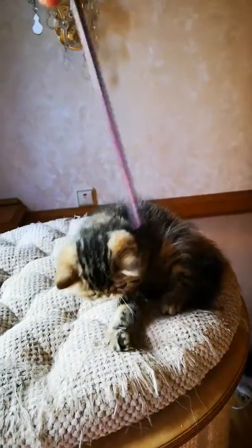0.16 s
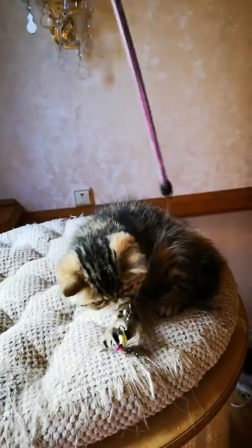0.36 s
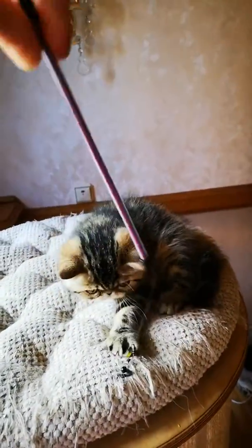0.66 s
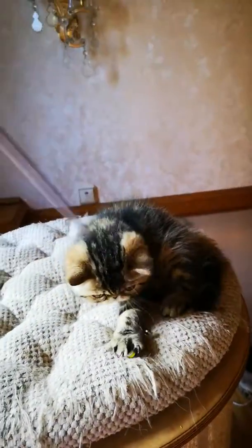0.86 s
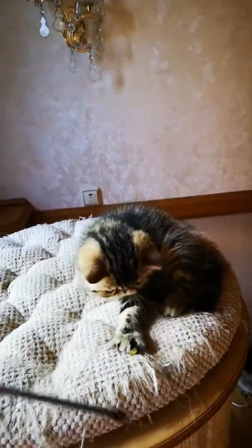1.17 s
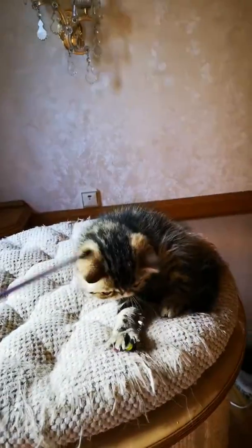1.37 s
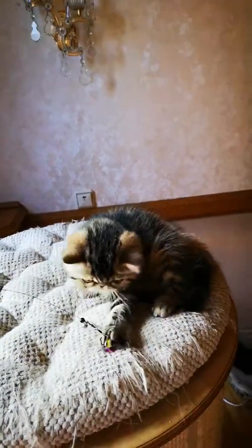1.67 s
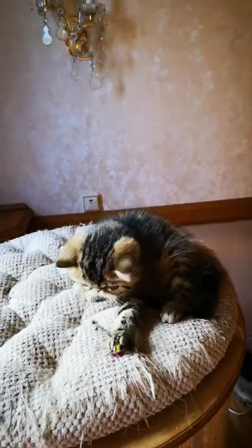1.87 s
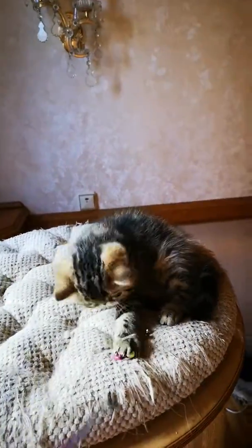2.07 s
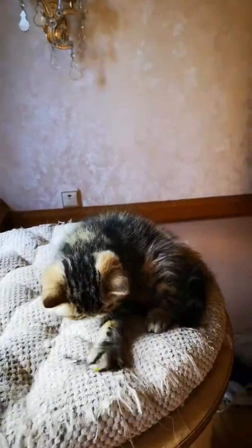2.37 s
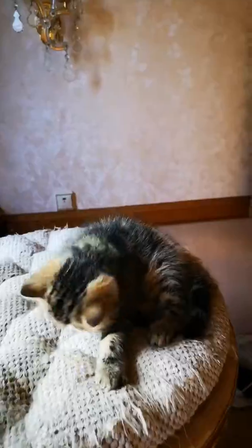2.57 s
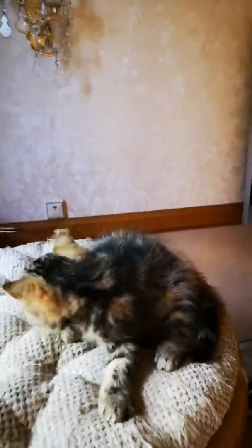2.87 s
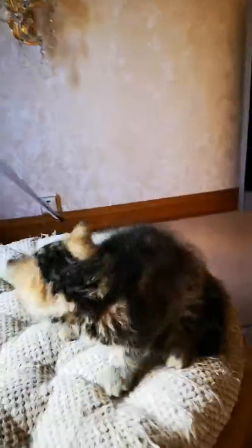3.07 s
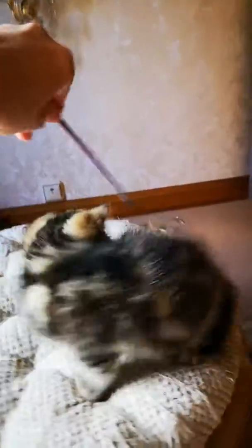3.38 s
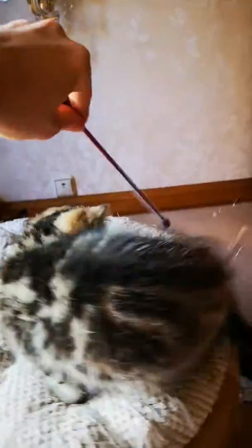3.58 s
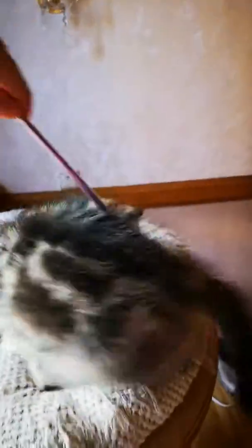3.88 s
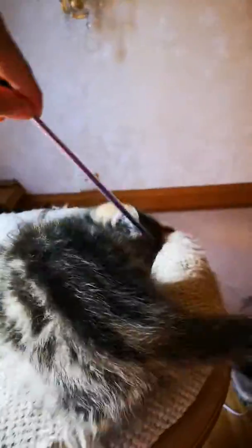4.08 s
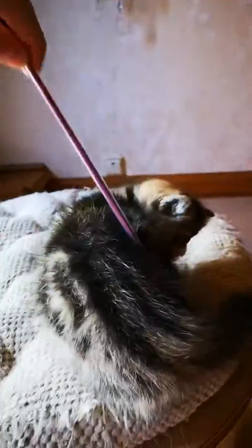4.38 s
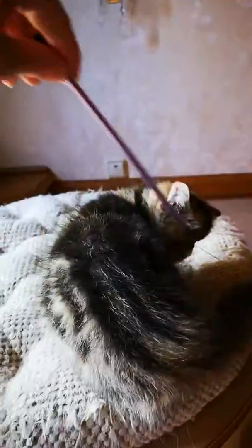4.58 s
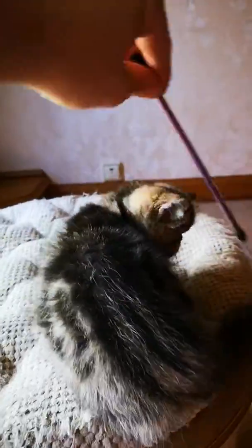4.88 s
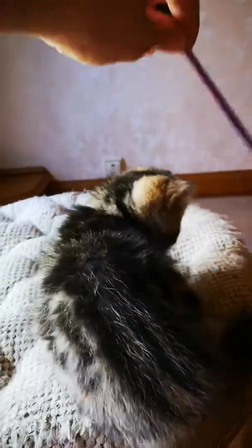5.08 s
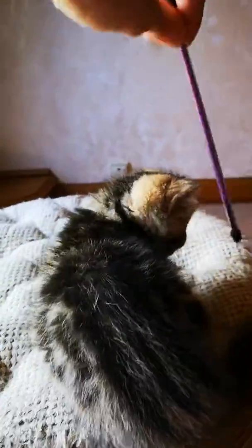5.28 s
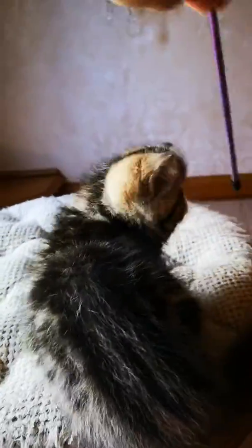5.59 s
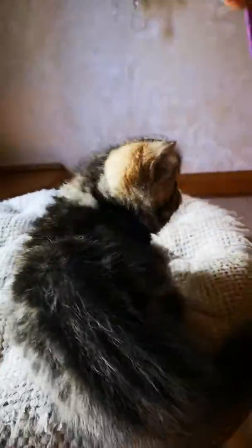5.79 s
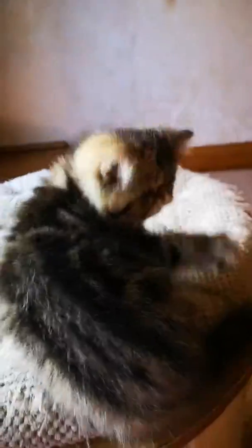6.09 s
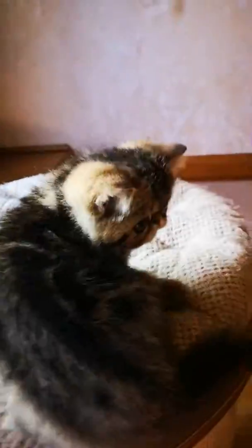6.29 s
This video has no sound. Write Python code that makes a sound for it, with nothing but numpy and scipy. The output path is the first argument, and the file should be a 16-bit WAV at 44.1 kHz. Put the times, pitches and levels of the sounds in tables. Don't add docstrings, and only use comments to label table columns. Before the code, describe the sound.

A tiny toy bell jingles and ticks as a kitten's paws brush knitted wool, then the toy raps sharply on wood in a quiet room.

```python
import sys
import numpy as np
from scipy import signal
from scipy.io import wavfile

SR = 44100
rng = np.random.default_rng(int(sys.argv[2]) if len(sys.argv) > 2 else 0)


def field_ratio(decibels):
    return 10 ** (np.asarray(decibels, dtype=float) / 20)


def transcribe(u):
    v = np.clip(np.atleast_2d(u).T, -1, 1)
    q = np.round(v * 32767).astype(np.int16)
    wavfile.write(sys.argv[1], SR, q)


N = 284004


def rms_one(x):
    return x / np.sqrt(np.mean(x ** 2) + 1e-20)


def in_time(rows):
    start_s, *columns = np.transpose(rows)
    return [np.interp(np.arange(N) / SR, start_s, column) for column in columns]


def at_hz(points, hz):
    points_hz, values = np.transpose(points)
    return np.interp(np.log(hz), np.log(points_hz), values)


def drift(rate_hz):
    r = np.exp(-80 * np.pi * rate_hz / SR)
    slow = signal.lfilter([1], [1, -2 * r, r * r], rng.standard_normal(N // 40 + 2002))[2000:]
    return np.interp(np.arange(N) / 40, np.arange(len(slow)), rms_one(slow))


def swells(rows, floor_db, rise_s, fall_s):
    t = np.arange(N) / SR
    power = field_ratio(2 * floor_db)
    for peak_s, level_db in rows:
        width_s = np.where(t < peak_s, rise_s, fall_s)
        power = power + field_ratio(2 * level_db) * np.exp(-((t - peak_s) / width_s) ** 2)
    return 10 * np.log10(power)


def passband(x, low_hz, high_hz, order=2):
    edges_hz = [low_hz, min(high_hz, .45 * SR)]
    return signal.sosfilt(signal.butter(order, edges_hz, "band", fs=SR, output="sos"), x)


def ring(clicks, hz, t60_s):
    r, w = field_ratio(-60 / (t60_s * SR)), 2 * np.pi * hz / SR
    return signal.lfilter([0, np.sin(w)], [1, -2 * r * np.cos(w), r * r], clicks + 1e-18)


def clicks_at(times_s, levels_db, pans_db):
    out = np.zeros((2, N))
    out[:, np.round(times_s * SR).astype(int)] = field_ratio(levels_db + pans_db * np.array([[.5], [-.5]]))
    return out


def grains(per_s, spread_db):
    sizes = field_ratio(spread_db * np.minimum(rng.exponential(1, N), 4)) * rng.choice([-1, 1], N)
    return sizes * (rng.random(N) < per_s / SR)


# freq_hz, correlation
LIKENESS = [(60, 1.0), (130, 1), (290, 0.78), (640, -0.29), (1410, 0.57), (3100, 0.098), (6820, 0.036),
            (15000, -0.79)]


def banded(spectrum, white, patchy_db):
    out = 0
    low_hz, high_hz = spectrum[0][0], spectrum[-1][0]
    edges = low_hz * 2 ** np.arange(0, np.log2(high_hz / low_hz) + .3, 1 / 3)
    for k, (low, high) in enumerate(zip(edges, edges[1:])):
        mid, side = passband(white[k % 2], low, high)
        hz = np.sqrt(low * high)
        alike = np.clip(at_hz(LIKENESS, hz), -1, 1)
        gain = field_ratio(at_hz(spectrum, hz) + patchy_db * drift(10.8))
        out = out + gain * (np.sqrt(1 + alike) * mid + np.sqrt(1 - alike) * side * [[1], [-1]])
    return rms_one(out)


# freq_hz, density_db_per_hz
HUSH = [(180, -13), (300, -6), (385, -14), (528, -4), (565, -18), (749, -3), (961, -5), (2170, -7),
        (2930, -10.5), (8220, -11), (11500, -22), (14700, -31), (16000, -33)]


def hush():
    return field_ratio(-62) * banded(HUSH, rng.standard_normal((2, 2, N)), patchy_db=2.5)


# freq_hz, density_db_per_hz
TRAFFIC = [(65, -44), (110, -2.5), (172, 6), (231, -2), (353, -9.5), (450, -26.5), (580, -25), (990, -120)]
# peak_s, level_db
WAVES = [(.45, -63.5), (1.05, -61), (2.45, -57), (3.8, -60), (5.2, -57.5), (6.3, -60.5)]


def traffic():
    level_db = swells(WAVES, floor_db=-61.5, rise_s=0.27, fall_s=0.27)
    return field_ratio(level_db) * banded(TRAFFIC, rng.standard_normal((2, 2, N)), patchy_db=2.5)


# peak_s, level_db
PASSES = [
    (.45, -56.5),
    (2.65, -57.5),
]


def engine_note():
    level_db = swells(PASSES, floor_db=-76, rise_s=0.096, fall_s=0.095)
    hz = 239.6 + 3.8 * drift(10.3)
    return field_ratio(level_db + 1.0 * drift(2.2)) * np.sin(2 * np.pi * np.cumsum(hz) / SR)


# peak_s, level_db
GUSTS = [(.55, -51), (.95, -51), (1.3, -48.5), (2.35, -47), (2.9, -66), (4.8, -59.5), (5.4, -52.5),
         (5.97, -37.5), (6.3, -37)]


def air_and_drone():
    gust_db = swells(GUSTS, floor_db=-58.5, rise_s=0.082, fall_s=0.069)
    mid, side = passband(rng.standard_normal((2, N)), 23, 40)
    air = field_ratio(gust_db) * rms_one(mid + field_ratio(-27) * side * [[1], [-1]])
    leaves_s, fade_db_per_s, buffet_db = 3.17, 4.5, -10.5
    drone_db = -58.5 - fade_db_per_s * np.maximum(np.arange(N) / SR - leaves_s, 0)
    mid, side = passband(rng.standard_normal((2, N)), 52, 105)
    drone = rms_one(mid + field_ratio(-19.5) * side * [[1], [-1]])
    return air + np.hypot(field_ratio(drone_db), field_ratio(gust_db + buffet_db)) * drone


# peak_s, level_db
LOADS = [(2.65, -66.5), (2.85, -66), (4.3, -69), (4.5, -61.5), (4.72, -63), (5.52, -63.5), (5.66, -65.5)]
# freq_ratio, level_db
WHINE_PARTNERS = [(1.152, -8), (2, -6), (1.54, -11), (.972, -11)]


def whine():
    idle_db, motor_hz, load_shift_hz_per_db = -74, 2177, 0.4
    level_db = swells(LOADS, idle_db, rise_s=.07, fall_s=.07)
    hz = motor_hz + load_shift_hz_per_db * (level_db - idle_db)
    turns = 2 * np.pi * np.cumsum(hz + 2.24 * drift(6.0)) / SR
    lines = np.sin(turns)
    for ratio, db in WHINE_PARTNERS:
        lines = lines + field_ratio(db + 2.5 * drift(2)) * np.sin(ratio * turns)
    return np.sqrt(2) * field_ratio(level_db + 1.5 * drift(5)) * lines


# freq_hz, density_db_per_hz
WOOL = [(300, -1), (600, -3.5), (1200, -6), (2200, -1.5), (4000, -8.5), (8000, -7.5)]
# peak_s, level_db
SWEEPS = [(.3, -59), (.95, -63), (1.27, -60.5), (2.3, -57), (2.62, -56.5), (3.8, -59), (4.3, -62.5),
          (4.9, -66)]


def brushing():
    fibres = np.array([rms_one(grains(1500.0, spread_db=4.5)) for port in range(2)])
    level_db = swells(SWEEPS, floor_db=-72, rise_s=0.073, fall_s=0.074)
    return field_ratio(level_db) * banded(WOOL, [fibres, fibres[::-1]], patchy_db=1.0)


# start_s, peak_db
PLUCKS = [(1.4127, -67), (2.6464, -44), (2.6864, -55), (2.7666, -37), (3.3344, -69), (4.2244, -35),
          (4.2438, -42), (4.6179, -52), (5.8676, -33)]


def plucks():
    start_s, peak_db = np.transpose(PLUCKS)
    return passband(clicks_at(start_s, peak_db + 16, 0 * start_s - 3.0), 11500, 16500)


# start_s, peak_db, treble_db, body_db, left_right_db
KNOCKS = [(0.5528, -35.5, 6, -3, -4), (1.335, -51, -20, 1, 5), (2.3059, -45, -2, 11, -2),
          (2.3364, -36.5, -1, 4.5, -2), (2.5954, -52.5, 10, 5, 11), (3.0004, -35.5, -17, -24, -4),
          (3.0507, -31, -10, -3.5, -4), (3.6678, -24.5, -11, -22, -3.5), (4.9546, -10, -13.5, -35, -4),
          (5.3028, -23.5, -61, -20, -9.5), (5.3171, -21, -9.5, -33, -0.5), (5.7008, -22, -37, -28, -3),
          (5.7675, -20, -11, -18, -2.5), (5.8996, -35.5, 4, -44, -7), (5.9143, -15.5, -41, -29, 2),
          (6.0066, -19.5, -12, -28, -2.5), (6.115, -10, -12, -32, -5.5), (6.2544, -16.5, -10, -35, -11.5),
          (6.2787, -18, -10.5, -19.5, 2.5)]
# freq_hz, width_hz, level_db
WOOD = [(1404, 100, -46), (1660, 880, 0), (2910, 800, 5.5), (4800, 3140, -5.5)]
# freq_hz, level_db, t60_s
SEAT = [(1370, 6, 0.0077), (1544, -1.5, 0.18), (1832, 8, 0.065), (2095, 11.5, 0.072), (2331, 2.5, 0.15),
        (2405, -6, 0.069)]


def knocks():
    start_s, peak_db, treble_db, body_db, pan_db = np.transpose(KNOCKS)
    snap_s = start_s + .0006
    blows = clicks_at(snap_s, peak_db + 16.0, pan_db)
    wood = 0
    for k, (hz, width_hz, db) in enumerate(WOOD):
        wood = wood + (-1) ** k * field_ratio(db) * passband(blows, hz - width_hz / 2, hz + width_hz / 2, order=1)
    seat = sum(field_ratio(db - 47.5) * ring(blows, hz, t60_s) for hz, db, t60_s in SEAT)
    crack = passband(clicks_at(snap_s, peak_db + treble_db + 20, pan_db), 3900, 10500)
    body = passband(clicks_at(start_s, peak_db + body_db + 18, pan_db), 173, 1020)
    snap = field_ratio(3) * passband(blows, 1600, 4800, order=4) + crack
    thud = passband(wood + seat, 1170, 10700, order=3) + field_ratio(-11.5) * crack + field_ratio(-5.0) * body
    return snap + body, thud


# freq_hz, level_db, t60_s
BELL = [(9626, -1.5, 0.061), (9230, -18.5, 0.01), (9820, -15.5, 0.024), (11100, -30, 0.14)]
# peak_s, peak_db
TICKS = [(.14, -25.5), (.1498, -22.5), (.1778, -26.5), (.3144, -23.5), (.539, -30.5), (1.2192, -17.5),
         (.857, -33.5), (.903, -23.5), (1.0023, -33.5), (1.2586, -26), (2.3384, -14.5), (2.4025, -30.5),
         (2.7321, -48), (2.3489, -17), (3.6457, -38), (3.6695, -30), (3.771, -19.5), (4.2998, -30),
         (4.4818, -25.5), (4.5221, -25), (4.6194, -26.5), (2.2328, -22.5), (5.116, -24), (5.9219, -52),
         (5.9742, -22.5), (6.0257, -17.5), (6.0623, -26), (6.1153, -24), (6.1745, -26), (6.2953, -27)]
# peak_s, peak_db
TAPS = [(.0194, -28.5), (.268, -24), (.3406, -32.5), (.3606, -31.5), (.8922, -30), (.5677, -40),
        (1.2971, -24.5), (1.3722, -46), (1.426, -43.5), (2.0502, -46), (2.108, -45), (2.2148, -26.5),
        (4.8302, -29.5), (3.084, -42), (2.5192, -22), (2.6442, -36), (3.2484, -42), (3.4728, -41),
        (3.5657, -30), (3.523, -37.5), (4.3282, -23), (4.416, -32), (4.6603, -25.5), (4.7655, -33.5),
        (5.045, -38), (5.315, -23.5), (5.7723, -25), (5.8874, -21.5), (6.009, -11), (6.0797, -26.5)]
# peak_s, peak_db
RINGS = [(.1274, -27), (.2136, -27), (.2534, -19), (.4049, -39), (.942, -33.5), (1.044, -45),
         (1.189, -35.5), (1.205, -26), (1.245, -31.5), (2.606, -33), (3.3538, -39), (3.9308, -39.5),
         (3.787, -26.5), (3.804, -22.5), (4.048, -39.5), (4.224, -30.5), (4.245, -29), (4.2622, -30.5),
         (4.448, -29), (4.6987, -30), (4.8438, -28), (5.2263, -29.5), (5.2935, -25), (5.342, -30.5),
         (5.5312, -32.5), (5.604, -40), (5.734, -31.5), (5.792, -29), (6.2256, -31), (6.4033, -26)]
# peak_s, peak_db
SKIDS = [(.063, -39.5), (.5107, -34.5), (.9751, -31.5), (1.284, -30.5), (2.3127, -31), (2.4439, -31.5),
         (2.5706, -33.5), (2.7058, -42), (2.7525, -36.5), (3.7152, -24.5), (4.199, -48), (4.306, -23.5),
         (4.4635, -29.5), (5.0893, -26), (5.1918, -28.5), (5.4177, -48.5), (5.493, -36), (5.579, -37),
         (5.8118, -30), (.62, -44.5), (2.4784, -48), (2.9, -46), (3.761, -29.5), (5.053, -28),
         (5.879, -27.5), (5.8968, -33), (6.1576, -30.5), (6.2637, -30.5)]


def bell_blows(pan_db):
    out, t = np.zeros((2, N + 4000)), np.arange(-1000, 3000) / SR
    after = np.maximum(t, 0)
    main_t60_s = BELL[0][2]
    choke_ms, choke_early_s = 1.5, .004
    kinds = [(TICKS, 0.7, 2), (TAPS, 1.0, 4.1), (RINGS, 1, 15.6), (SKIDS, 7.9, 2.5)]  # swell_ms, fade_ms
    strikes = sorted((*row, swell_ms, fade_ms) for rows, swell_ms, fade_ms in kinds for row in rows)
    until_next_s = np.diff([row[0] for row in strikes], append=N / SR + 1)
    luck = rng.normal(0, 1, (len(strikes), 2 * len(BELL) + 2))
    for (peak_s, peak_db, swell_ms, fade_ms), gap_s, chance in zip(strikes, until_next_s, luck):
        swell = field_ratio(-6 * (t * 1e3 / max(swell_ms, .3)) ** 2)
        fade = field_ratio(-6 * t * 1e3 / max(fade_ms, .4))
        shape = np.where(t < 0, swell, fade)
        shape = np.maximum(shape, field_ratio(-15.0 - 60 * t / main_t60_s) * (t > 0))
        shape = shape * field_ratio(-6 * np.maximum(t - gap_s + choke_early_s, 0) * 1e3 / choke_ms)
        turned = np.array([[1.76 * chance[-1]], [0]])
        tone = 0
        for k, (hz, db, t60_s) in enumerate(BELL):
            mode_db = db - 60 * after * (0.48 / t60_s - 0.41 / main_t60_s)
            phase = 2 * np.pi * (hz + 32 * chance[k]) * t + 9 * chance[k + len(BELL)]
            tone = tone + field_ratio(mode_db) * np.sin(phase + turned)
        i = round(peak_s * SR)
        level_db = peak_db + pan_db[:, [i]] + 1.35 * chance[-2] * np.array([[1], [0]])
        burst = field_ratio(level_db) * shape * tone
        out[:, max(i - 1000, 0):i + 3000] += burst[:, max(1000 - i, 0):]
    return out[:, :N]


# start_s, rattle_db, left_right_db, tinsel_db (against the ring)
SHAKE = [(0.0, -64, -8.5, -19), (0.242, -68, -6, -17.5), (0.75, -84, -12.5, -27.5),
         (1.164, -71, -11.5, -17), (1.56, -81, -14.5, -35), (1.98, -78.5, -11, -18),
         (2.46, -54.5, -13.5, -25), (2.6, -44, -11.5, -14.5), (2.87, -63.5, 3, -20.5), (3.13, -66, -9, -23),
         (3.74, -53, -8.5, -23), (4.1, -64.5, -13, -27.5), (4.51, -54, -6.5, -20), (5.4, -50, -3.5, -16),
         (5.68, -62.5, -16, -43), (5.87, -42.5, -9.5, -17), (6.28, -49.5, -8.5, -27.5),
         (6.44, -69, 5.5, -19)]


def bell():
    rattle_db, left_db, rustle_db = in_time(SHAKE)
    pan_db = left_db * np.array([[.5], [-.5]])
    bounces = rms_one(grains(250.0, spread_db=4.0)) * field_ratio(2.5 * drift(30))
    shell = sum(field_ratio(db) * ring(bounces, hz, 0.3 * t60_s) for hz, db, t60_s in BELL)
    rattle = field_ratio(rattle_db + 3.5 + pan_db) * rms_one(passband(shell, 9000, 10150))
    ringing = bell_blows(pan_db) + rattle
    settle = np.exp(-1 / (0.011 * SR))
    jolt = signal.lfilter([1 - settle], [1, -settle], np.mean(ringing ** 2, axis=0)) ** 0.45
    shared = grains(1500.0, spread_db=4.5)
    own = np.array([grains(3500.0, spread_db=3.5) for port in range(2)])
    crinkles = (shared + own) * field_ratio(2.5 * drift(40))
    tinsel = passband(crinkles, 9150, 10300, order=1) + field_ratio(-73.0) * passband(crinkles, 7500, 14300)
    tinsel = rms_one(passband(tinsel, 8600, 15000, order=3))
    return ringing + field_ratio(rustle_db + 6.0 + .5 * pan_db) * jolt * tinsel


# freq_hz, t60_s
ROOM_T60 = [(500, 0.88), (2000, 0.42), (5000, 0.33), (10000, 0.11), (15000, 0.052)]
# delay_s, level_db
ECHOES = [(.0016, -7), (.0026, -6), (.0056, -9), (.0083, -5), (.0102, -9)]


def room(x, tail_db, echoes):
    t = np.arange(SR // 2) / SR
    tail, edges = 0, 250 * 2 ** np.arange(0, 6.4, .5)
    white = rng.standard_normal((2, len(t)))
    for low, high in zip(edges, edges[1:]):
        tail = tail + passband(white, low, high) * field_ratio(-60 * t / at_hz(ROOM_T60, low))
    near_surfaces = (1 - np.exp(-t / 0.0011)) * (1 + 0.24 * np.exp(-t / 0.0043))
    tail = field_ratio(tail_db) * tail * near_surfaces
    for delay_s, db in echoes:
        at = (SR * delay_s * rng.uniform(.93, 1.07, 2)).astype(int)
        tail[[0, 1], at] += field_ratio(db) * rng.choice([-1, 1])
    return signal.fftconvolve(x, tail, axes=1)[:, :N]


def scene():
    background = hush() + traffic() + engine_note() + air_and_drone()
    jingle = bell()
    snaps, thuds = knocks()
    near = jingle + snaps + plucks() + whine()
    near[0] = np.roll(near[0], 6)
    wet = room(jingle, tail_db=-28, echoes=[]) + room(thuds, tail_db=-22.0, echoes=ECHOES)
    return near + wet + brushing() + background


def top_cut(x):
    return signal.sosfilt(signal.butter(12, 16480, fs=SR, output="sos"), x)


def record(dry):
    mix = signal.sosfilt(signal.cheby2(6, 16, 15500, fs=SR, output="sos"), dry)
    return top_cut(mix)


dry = scene()
out = record(dry)
transcribe(out)
```